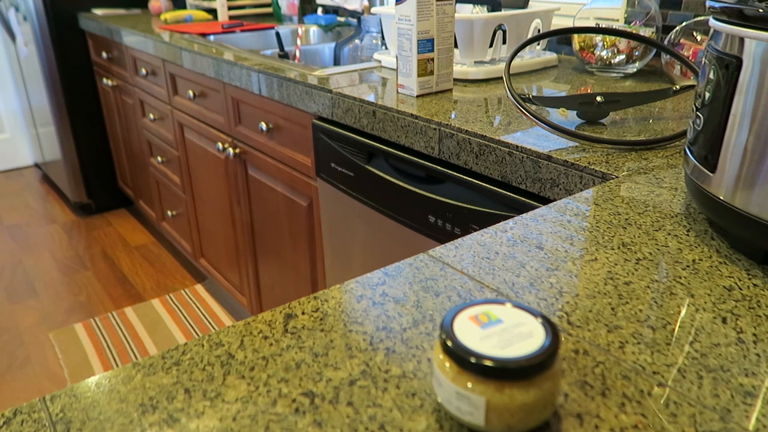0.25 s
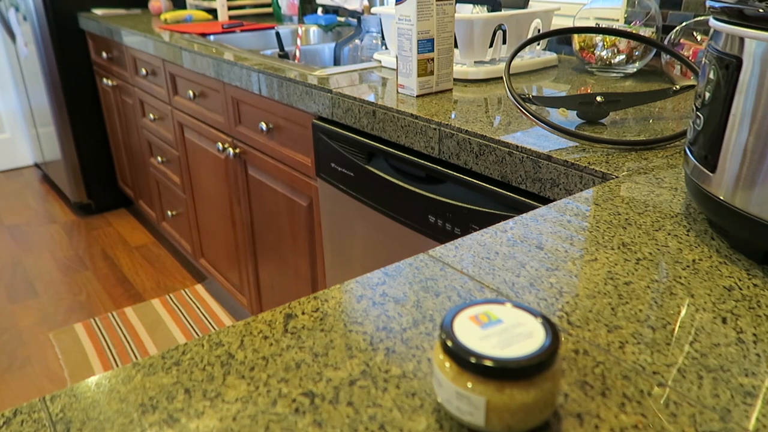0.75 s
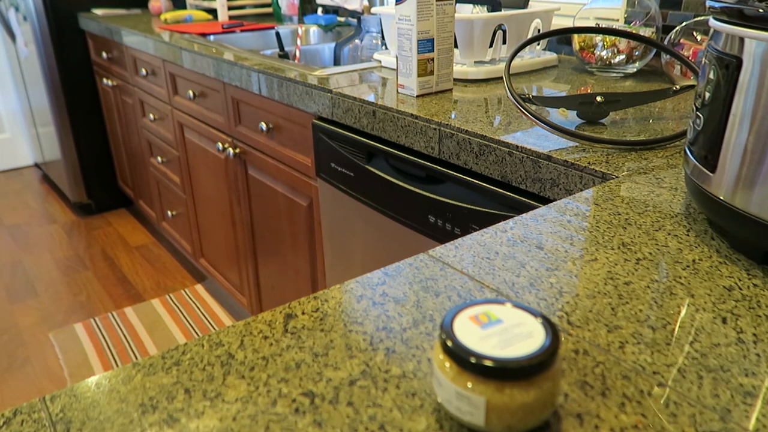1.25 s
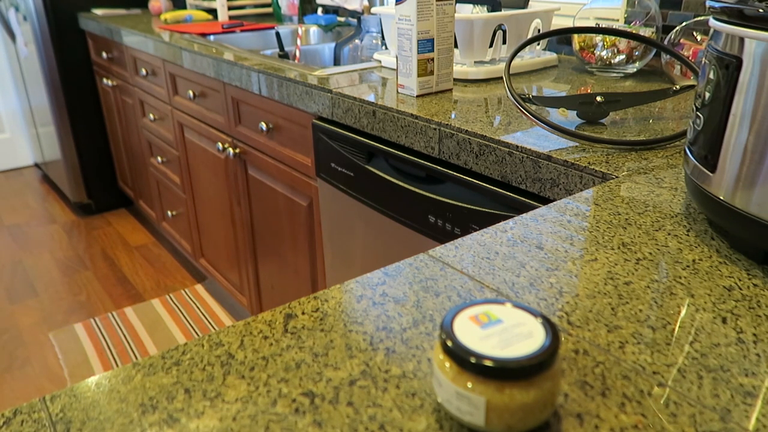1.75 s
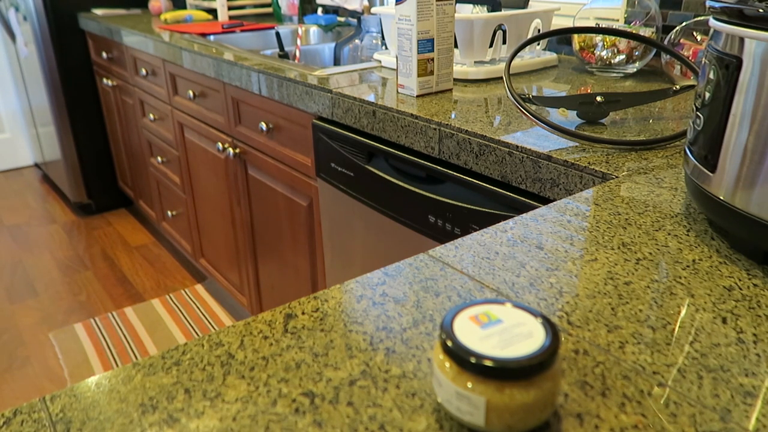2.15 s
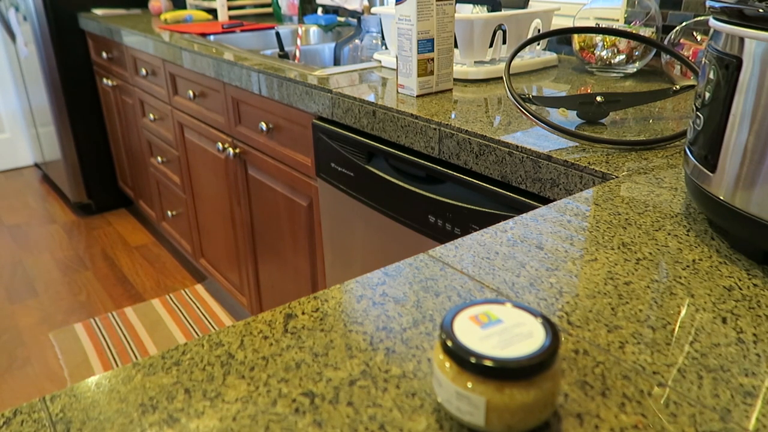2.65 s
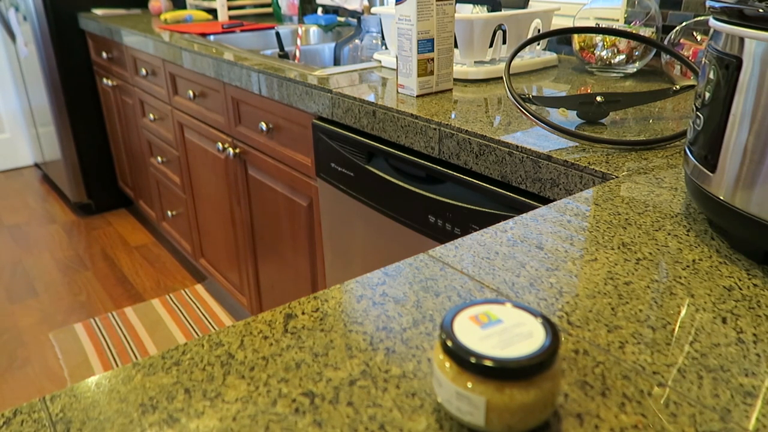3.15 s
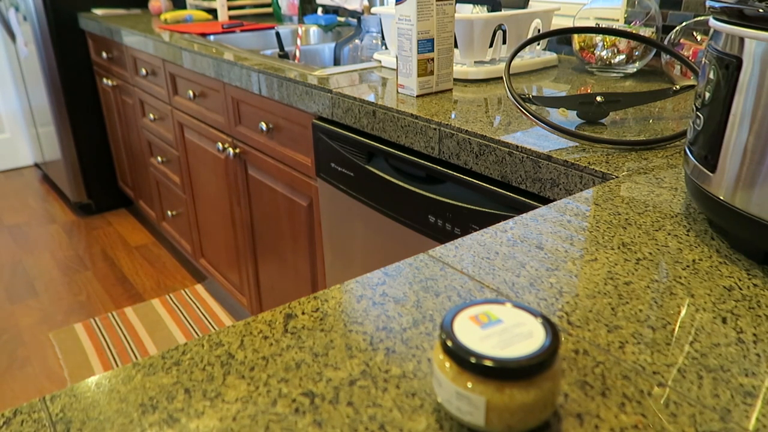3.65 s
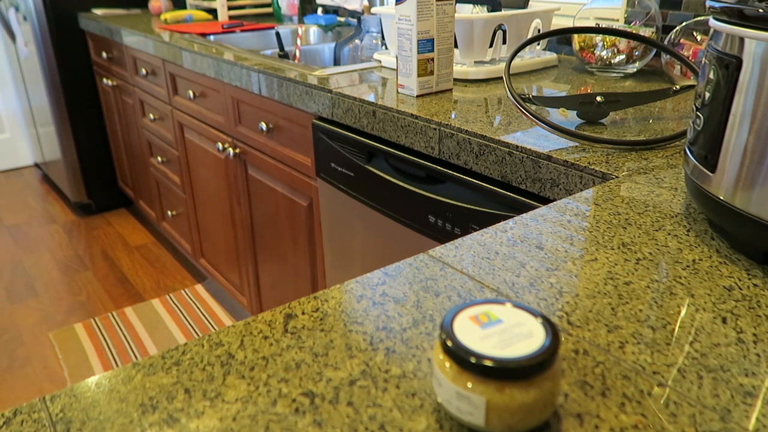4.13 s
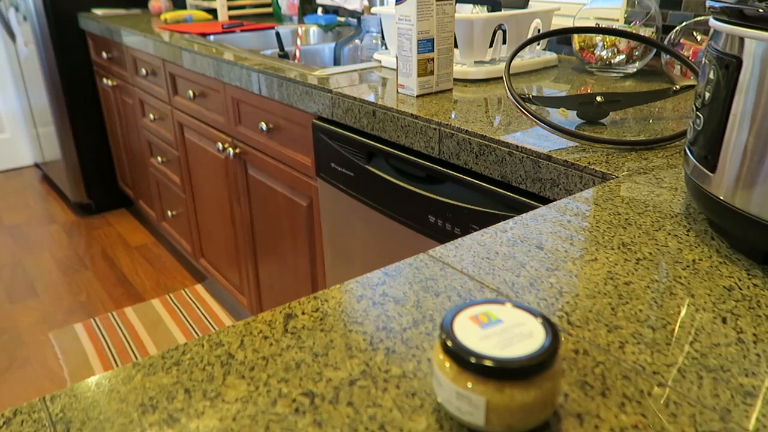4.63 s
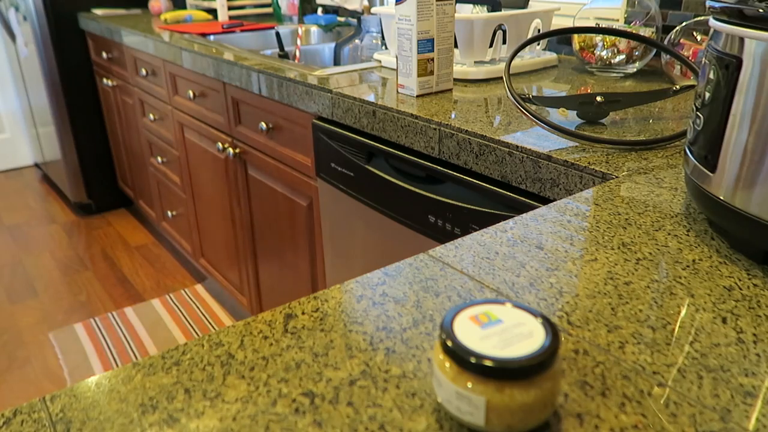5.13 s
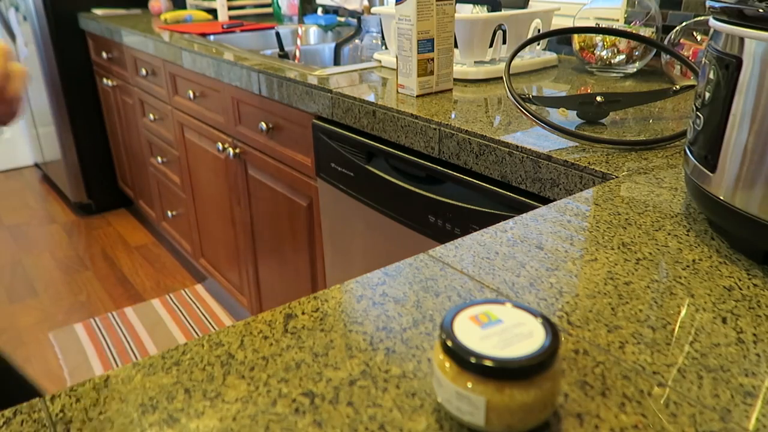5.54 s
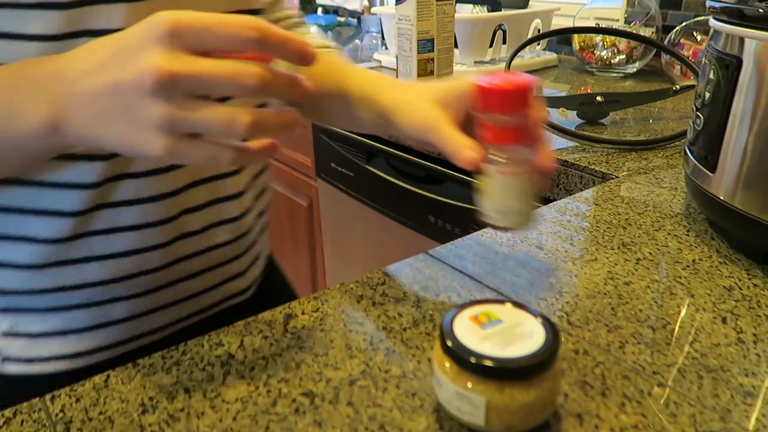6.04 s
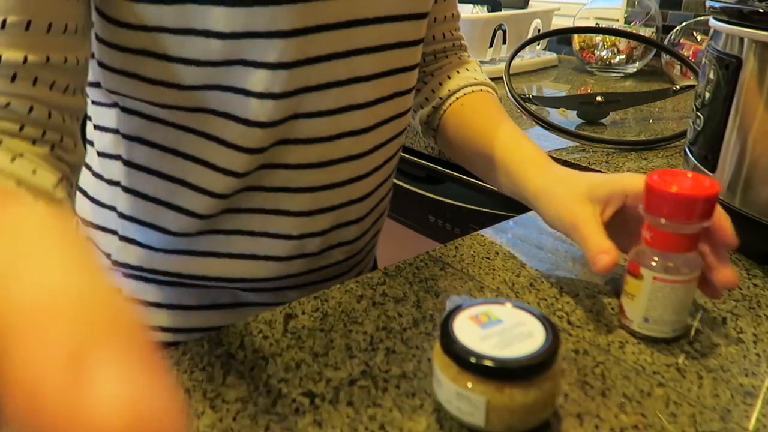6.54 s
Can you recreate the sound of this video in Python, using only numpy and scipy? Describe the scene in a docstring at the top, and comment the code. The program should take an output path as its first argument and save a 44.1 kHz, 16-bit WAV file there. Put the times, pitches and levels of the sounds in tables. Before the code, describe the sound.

Cupboard doors knock in a home kitchen, one very loud around three seconds, then footsteps approach and a spice jar clicks down close by.

```python
"""Cupboards and a jar in a kitchen

Heard from a stone counter: heavy and light wooden doors knock as damped panel modes with cracks of coloured noise.
Shelf contacts, crockery, loose hardware and a singing hinge are short noise bursts or decaying modes.
Footfalls boom in the floor; a spice jar set down close by clicks, rings and thuds as its grains patter.
A fridge hums in wavering partials over fan noise. Decaying noise supplies the echoes of the room.
"""
import sys
import numpy as np
from scipy import signal
from scipy.fft import rfft, irfft
from scipy.io import wavfile

SR = 44100
rng = np.random.default_rng(int(sys.argv[2]) if len(sys.argv) > 2 else 0)


def digitize_waveform(pressure):
    """Quantize a signal to 16-bit integers and store it at the path in sys.argv[1].

    Rows of a 2-D input are taken as channels; values are limited to [-1, 1].
    """
    field = np.atleast_2d(pressure).T
    bounded = np.clip(field, -1, 1)
    quanta = np.round(bounded * 32767).astype(np.int16)
    wavfile.write(sys.argv[1], SR, quanta)


N = 299306
TIME = np.arange(N) / SR
RING = TIME[:SR]  # time axis of one event, 1 s long
LEFT_RIGHT = np.array([[1], [-1]])

# Fan noise spectrum before scaling to rms 1: f/Hz, relative level/dB
AIR_SPECTRUM = [(12, -56), (20, -9), (49, -3), (89, -6), (111, -2), (174, -6), (194, -2.5), (294, -10),
                (377, -9), (470, -11.5), (693, -13.5), (818, -18.5), (1550, -23), (7100, -43), (12000, -51),
                (15000, -70)]
# Fan noise, difference of the ports against their sum: f/Hz, side minus mid/dB
AIR_SIDE = [(60, -35), (110, -12.5), (200, -5), (380, 2), (700, -3), (1290, -0.5), (2380, -1.5),
            (4400, 1.5), (8120, 1), (15000, 5.5)]
AIR_DB = -46.5
# Steady fridge partials: f/Hz, level/dB
HUM_PARTIALS = [(118.4, -64), (172.3, -53), (296.1, -59), (473.7, -61.5), (678.3, -67), (1184, -74)]
# Partials that swell once a body stands near: f/Hz, level/dB
NEAR_HUM_PARTIALS = [(118.4, -53.5), (355.3, -53.5)]

# Reverberation time of the kitchen: f/Hz, t60/s
ROOM_T60 = [(60, 0.37), (200, 0.42), (500, 0.65), (1500, 0.64), (3000, 0.65), (6000, 0.98), (14000, 0.39)]
# Echo, difference of the ports against their sum: f/Hz, side minus mid/dB
ROOM_SIDE = [(60, -39), (150, -35), (300, -13), (1000, -17.5), (3000, -13.5), (6000, -5.5), (12000, 7)]

# Faint high rubbing: t/s, level/dB, time to fall about 20 dB/s
SWISHES = [(3.728, -55, 0.18), (4.126, -57, 0.061), (4.254, -60, 0.12), (5.457, -66, 0.23)]
# Runs of faint high ticks: start t/s, end t/s, mean level/dB
FAINT_TICKING = [(0.055, 0.758, -54.5), (6.219, 6.46, -53)]
# Small close ticks and the jar let go: t/s, level/dB, centre f/Hz
TICKS = [(5.575, -47, 6860), (5.778, -41.5, 2140), (5.962, -34, 654), (6.060, -40.5, 2310),
         (6.061, -42, 5800), (6.075, -43, 2750), (6.118, -40, 676), (6.694, -45, 5300), (6.7585, -29, 2230)]

# Footfalls on the wooden floor: t/s, level/dB
STEPS = [(4.301, -30), (4.512, -30), (5.249, -25), (5.957, -33)]
# Floor board modes: f/Hz, relative level/dB, t60/s
FLOOR_MODES = [(32.6, 4, 0.21), (44, 7.5, 0.31), (60, -13, 0.11), (102, 0, 0.1), (135, -32, 0.13)]

# Things dragged along the shelf: t/s, level/dB, length/s, centre f/Hz, width/Hz
SLIDES = [(3.24, -56, 0.13, 1490, 990), (4.576, -60, 0.1, 2170, 2000), (4.72, -60, 0.19, 1680, 600)]
# Crockery touching: t/s, level/dB, f/Hz
CLINKS = [(1.673, -36, 1040), (1.674, -51, 1310), (2.434, -38, 1210), (2.435, -40, 1730)]
# Things shifted on the shelf: t/s, level/dB, centre f/Hz, width/Hz
SHELF_CONTACTS = [(0.006, -34, 595, 1400), (1.52, -33.5, 1320, 800), (1.524, -49, 3130, 900),
                  (1.534, -38, 2000, 900), (1.542, -44.5, 3030, 700), (1.546, -43, 1660, 500),
                  (1.588, -47, 2680, 900), (1.674, -41, 1500, 1000), (3.228, -36, 1400, 800),
                  (3.248, -39, 1700, 1010), (3.322, -42, 1370, 700), (5.252, -36.5, 1300, 1540),
                  (5.258, -39.5, 2750, 1010), (5.266, -47.5, 5100, 900)]
# Each then tips onto an edge: later, softer, duller (the pitch is a ratio)
SETTLE_S, SETTLE_DB, SETTLE_PITCH, SETTLE_WIDTH_HZ = 0.0099, -10.5, 0.52, 2700

# Loose hinges, knobs and catches clattering: t/s, level/dB, centre f/Hz, width/Hz
FITTINGS = [(0.197, -41, 4000, 1200), (0.211, -36, 1800, 900), (0.225, -47, 3800, 1600),
            (2.692, -16.5, 1330, 350), (2.695, -31.5, 3400, 900), (2.705, -26, 3000, 400),
            (2.712, -25, 2950, 280), (2.713, -27, 1400, 450), (2.7195, -23, 1990, 480),
            (2.738, -33.5, 2600, 700), (2.757, -31, 2300, 800), (2.791, -34, 2950, 350),
            (2.858, -35, 1200, 600), (2.968, -43, 1800, 700), (2.979, -46, 3000, 700),
            (2.991, -31, 1700, 800), (2.995, -41, 3300, 600), (3.047, -38, 1700, 823),
            (3.075, -49, 2200, 1200), (4.175, -31, 2100, 500), (4.184, -36, 2200, 650)]
HINGE_AT_S, HINGE_DB = 2.966, -37.5
# Hinge spring modes: f/Hz, relative level/dB, t60/s
HINGE_MODES = [(782, 6, 0.17), (847, 7, 0.12), (810, -7, 0.45)]
# Cabinet body modes: f/Hz, level/dB, t60/s
CABINET_MODES = [(105.6, -32, 0.13), (140, -31, 0.11), (276, -28.5, 0.15)]

# Jar landing and rocking twice, each rim first, then flat: t/s, force/dB, rim-to-flat time/s
JAR_LANDINGS = [(6.4796, -0.2, .0054), (6.4965, -12, .006), (6.5138, -8.5, 0.00183)]
# Jar wall modes: f/Hz, relative level/dB, t60/s
JAR_MODES = [(551, -10.5, 0.092), (700, -12, 0.12), (792, -1, 0.05), (1108, 8, 0.046), (1224, -6, 0.08),
             (1350, -4, 0.08), (1765, -12, 0.051), (1915, -1, 0.089), (1990, -15, 0.077),
             (2560, -5.5, 0.07), (2715, -3.5, 0.094), (2888, -2, 0.17), (3016, -5.5, 0.16),
             (3137, -10.5, 0.072)]
# Counter modes: f/Hz, relative level/dB, t60/s
COUNTER_MODES = [(95.4, 12.5, 0.18), (124, 6, 0.062), (158, 3, 0.079), (291, 2.5, 0.086), (384, -6, 0.13),
                 (720, -8, 0.068), (744, 3.5, 0.034)]
# Click of jar on stone: f/Hz, relative level/dB
JAR_CLICK = [(60, -5), (200, 3.5), (800, -5), (1800, 4.5), (2300, 0.5), (3200, -3), (4300, -10),
             (8000, -18), (10500, -45), (14000, -21)]
RIM_CUT_HZ, FLAT_CUT_HZ = 4200, 3600  # top of the click for either contact
JAR_CLICK_DB, JAR_RING_DB, THUD_DB = -16, -21, -27.5  # at full force
BODY_GROWTH = 2.5  # dB of ring and thud per dB of force: a light touch mostly clicks
JAR_ECHO_S, JAR_ECHO_BUILD_S = 0.022, 0.015  # the jar is close: the walls answer late and swell slowly
JAR_WALLS_DB, JAR_NEARBY_DB = -16, -16.5  # echo from the walls and from things on the counter
SPICE_DB, SPICE_HZ, SPICE_WIDTH_HZ, SPICE_T60_S = -46.5, 11500, 12000, 0.12

# Light door nudged, knocking, juddering, falling back: t/s, force/dB, crack level/dB, crack cut-off f/Hz
LIGHT_KNOCKS = [(1.477, -35, -51, 1970), (1.523, -33.5, -43.5, 3620), (1.766, -34, -50, 2000),
                (2.422, -29.5, -46, 2000), (2.635, -27.5, -46.5, 2000), (2.689, -0.5, -22.5, 8340),
                (2.752, -21, -35, 3500), (2.771, -24.5, -41.5, 2370), (2.789, -20, -33.5, 2400),
                (2.965, -13, -28.5, 4030), (2.99, -22.5, -38, 4000), (3.228, -32, -49, 2000),
                (3.485, -34.5, -47.5, 1500), (3.499, -28, -51, 1520)]
# Light panel modes: f/Hz, relative level/dB, t60/s
LIGHT_MODES = [(169, -12.5, 0.12), (185.9, -4.5, 0.13), (258, -3, 0.07), (282, -11.5, 0.13),
               (375, 3, 0.048), (387, -13.5, 0.14), (708, -14, 0.064), (880, -43, 0.3), (1150, -9.5, 0.023),
               (1400, -20, 0.039), (1610, -38, 0.18)]
# Light door's crack of wood on the frame: f/Hz, relative level/dB
LIGHT_CRACK = [(100, -31), (260, 1), (420, 8.5), (580, 2), (1100, 1), (1600, 1), (2000, -8.5), (2400, -5.5),
               (3200, -11.5), (4500, -15), (6500, -25.5), (8000, -33), (14000, -43)]
# Heavy door on its bumpers: t/s, force/dB, crack level/dB, crack cut-off f/Hz, rebound minus blow/dB
HEAVY_KNOCKS = [(0.005, -28.5, -37, 2000, -25), (0.182, -13.5, -27, 5160, 0), (0.55, -35.5, -59, 2000, -15),
                (3.999, -34, -57, 2000, -24), (4.155, -6.5, -15, 3820, -18.5)]
# Heavy panel modes: f/Hz, relative level/dB, t60/s
HEAVY_MODES = [(63.6, -16, 0.36), (95.7, -3, 0.23), (126, 8, 0.064), (152.5, 8, 0.071), (184.2, -4, 0.1),
               (251.4, -5.5, 0.13), (401, -12, 0.1), (481.4, -20, 0.15), (750, -3.5, 0.02),
               (842, -24, 0.094), (1206, -16.5, 0.029), (1960, -38, 0.087)]
# Heavy door's crack of wood on the frame: f/Hz, relative level/dB
HEAVY_CRACK = [(100, -6), (300, 11.5), (450, 8), (750, 9), (1100, -5.5), (1600, 0.5), (2400, -1.5),
               (3200, -7), (3900, -17.5), (4800, -18.5), (8000, -18.5), (14000, -30)]
HEAVY_REBOUND_S = 0.0218  # the panel springs back and lands again
HEAVY_CRACK_LAG_S = 0.0055  # the frame is hit once the bumpers are squeezed flat
# How well the cabinets radiate treble: f/Hz, level/dB
WOOD_TREBLE = [(2800, 0.5), (3600, 0), (4000, -2.5), (5100, 0.5), (6500, 1), (9000, 6), (12000, 1)]
TOP_HZ = 14800


def undb(db):
    """Level: an amplitude gain is ten to the power of dB/20."""
    return 10 ** (np.asarray(db) / 20)


def at(points, hz):
    """Interpolation: (f, value) points are read on a log-frequency axis."""
    f, value = np.transpose(points)
    return np.interp(np.log(hz + 0.0011), np.log(f), value)


def shape(x, gain):
    """Linear filtering: the spectrum is multiplied by a gain that depends on frequency."""
    size = x.shape[-1]
    frequencies = np.arange(size // 2 + 1) * SR / size
    return irfft(rfft(x) * gain(frequencies), size)


def noise(gain, size=SR):
    """Coloured noise: white noise is filtered, then scaled to rms 1."""
    x = shape(rng.standard_normal(size), gain)
    return x / x.std()


def resonance(hz, width_hz):
    """Resonance: the gain peaks at its centre and falls on broad, steep skirts."""
    return lambda f: 1 / (1 + ((f * f - hz * hz) / (f * width_hz * 2 + 1)) ** 2) ** 2


def fade(t60, rise_s):
    """Damping: a blow builds up quickly and decays exponentially."""
    build_up = 1 - np.exp(-RING / rise_s)
    return build_up * np.exp(-np.log(1000) * RING / t60)


def ring(modes, rise_s):
    """Modal superposition: one push sets damped sinusoids swinging."""
    return sum(undb(db) * fade(t60, rise_s) * np.sin(2 * np.pi * hz * RING) for hz, db, t60 in modes)


def rattle(spread_db, grain_hz=500):
    """Intermittent contact: random level changes make a chattering gain of rms 1."""
    gain = undb(spread_db * noise(lambda f: np.exp(-f / grain_hz)))
    return gain / np.sqrt(np.mean(gain ** 2))


def unsteady(modes, rise_s, waver_db, waver_hz):
    """Modulated modes: each mode of a rocking or moving thing swells and dips on its own."""
    return sum(ring([mode], rise_s) * rattle(waver_db, waver_hz) for mode in modes)


def burst(colour, envelope):
    """Energy scaling: a puff of coloured noise carries the energy of its envelope."""
    x = noise(colour) * envelope
    return x * np.sqrt(np.sum(envelope ** 2) / np.sum(x ** 2))


def radiate(x, lowest_hz):
    """Radiation efficiency: a panel radiates poorly below its lowest modes."""
    return signal.sosfilt(signal.butter(2, lowest_hz, "high", fs=SR, output="sos"), x)


def add(track, s, sound):
    """Superposition: a sound is summed into a track from time s."""
    start = max(int(s * SR), 0)
    track[start:start + len(sound)] += sound[:N - start]


def strike(blows, sound):
    """Linearity: the same ringing body answers every (t, level) in proportion."""
    out = np.zeros(N)
    for s, db in blows:
        add(out, s, undb(db) * sound)
    return out


def widen(mid, side, side_db):
    """Spatial coherence: two close microphone ports agree in the bass and differ in the treble."""
    return mid + LEFT_RIGHT * shape(side, lambda f: undb(at(side_db, f)))


def kitchen(gap_s=0.004, build_s=0.00043):
    """Diffuse reverberation: hard walls return noise whose octaves die at their own rates."""
    hiss = widen(*rng.standard_normal((2, SR)), ROOM_SIDE)
    tail = 0
    for hz in 2. ** np.arange(5, 15):
        octave = shape(hiss, lambda f: np.clip(1 - abs(np.log2((f + 1) / hz)), 0, 1))
        tail = tail + octave * fade(at(ROOM_T60, hz), build_s)
    # the decay at 1 kHz sets the energy to about one
    tail = tail / np.sqrt(np.sum(fade(at(ROOM_T60, 1000), build_s) ** 2))
    return np.pad(tail, ((0, 0), (int(gap_s * SR), 0)))


def echo(x, room, wet_db):
    """Convolution: the room answers every instant of a sound with its impulse response."""
    return undb(wet_db) * signal.fftconvolve(x[None], room, axes=1)[:, :N]


def place(x, room, wet_db):
    """Direct and reverberant fields: the two add at the listener."""
    return x + echo(x, room, wet_db)


def clacks(events, room, t60, rise_s, wet_db, spread_db=0):
    """Hard contact: each excites the broad resonance of its object; loose ones chatter."""
    out = np.zeros(N)
    for s, db, hz, width_hz in events:
        chatter = fade(t60, rise_s) * rattle(spread_db)
        add(out, s, undb(db) * burst(resonance(hz, width_hz), chatter))
    return place(out, room, wet_db)


def cracks(contacts, colour, t60, rise_s, spread_db):
    """Contact stiffness: wood chatters on the frame, with the treble cut at each contact's own frequency."""
    out = np.zeros(N)
    for s, db, cut_hz in contacts:
        chatter = fade(t60, rise_s) * rattle(spread_db)
        spectrum = lambda f: undb(at(colour, f)) / np.hypot(1, (f / cut_hz) ** 5)
        add(out, s, undb(db) * burst(spectrum, chatter))
    return out


def hum(partials, waver_db):
    """Tonal vibration: motor partials waver slowly and independently about their levels."""
    out = np.zeros(N)
    for hz, db in partials:
        level = undb(db + waver_db * noise(lambda f: np.exp(-f / 3), size=N))
        out += np.sqrt(2) * level * np.sin(2 * np.pi * (hz * TIME + rng.random()))
    return out


def background():
    """Broadband and tonal sources: fridge fan noise lies under the compressor's partials."""
    mid, side = (noise(lambda f: undb(at(AIR_SPECTRUM, f)), size=N) for _ in range(2))
    fan = undb(AIR_DB) * widen(mid, side, AIR_SIDE)
    nearness = np.interp(TIME, [5.9, 6.15], [0, 1])
    near_hum = nearness * hum(NEAR_HUM_PARTIALS, waver_db=1.5)
    return fan + hum(HUM_PARTIALS, waver_db=1.5) + near_hum


def swishes():
    """Friction noise: brief rubbing gives a broad, high hiss."""
    out = np.zeros(N)
    for s, db, length_s in SWISHES:
        hiss = noise(resonance(hz=11600, width_hz=60000))
        add(out, s, undb(db) * hiss * fade(3 * length_s, rise_s=0.017))
    return out


def ticking(room, per_second, scatter_db):
    """Repeated impulses: tiny ticks scatter in level and stray slightly from even spacing."""
    events = []
    for start, end, db in FAINT_TICKING:
        times = np.arange(start, end, 1 / per_second)
        late, loud = rng.standard_normal((len(times), 2)).T
        for s, more in zip(times + 0.0039 * late, loud):
            events.append((s, db + scatter_db * more, 4400, 700))
    return clacks(events, room, t60=0.022, rise_s=0.0009, wet_db=-2)


def ticks(room):
    """Near field: small contacts close by sound dry, the direct sound outweighing the echo."""
    events = [(s, db, hz, 0.23 * hz) for s, db, hz in TICKS]  # width is a share of the centre
    return clacks(events, room, t60=0.012, rise_s=0.00099, wet_db=-10)


def footsteps(room):
    """Soft impact: slow-rising blows of the heels set the floor boards booming."""
    return place(strike(STEPS, ring(FLOOR_MODES, rise_s=0.016)), room, wet_db=2.5)


def slides(room):
    """Uneven friction: something is dragged along the shelf in fits and starts."""
    out = np.zeros(N)
    for s, db, length_s, hz, width_hz in SLIDES:
        push = np.sin(np.pi * np.minimum(RING / length_s, 1))
        jerks = push * rattle(spread_db=6.5, grain_hz=90)
        add(out, s, undb(db) * burst(resonance(hz, width_hz), jerks))
    return place(out, room, wet_db=1.5)


def clinks(room):
    """Free vibration: touching crockery rings briefly, one damped mode per table row."""
    out = np.zeros(N)
    for s, db, hz in CLINKS:
        add(out, s, ring([(hz, db, 0.032)], rise_s=0.0004))
    return place(out, room, wet_db=2.5)


def shelf(room):
    """Impact then settling: each thing clacks, then gives a lower, grainy scrape."""
    settling = [(s + SETTLE_S, db + SETTLE_DB, hz * SETTLE_PITCH, SETTLE_WIDTH_HZ)
                for s, db, hz, _ in SHELF_CONTACTS]
    clack = clacks(SHELF_CONTACTS, room, t60=0.026, rise_s=0.0007, wet_db=2.0, spread_db=5)
    scrape = clacks(settling, room, t60=0.072, rise_s=0.014, wet_db=-3.5, spread_db=9.5)
    return clack + scrape


def fittings(room):
    """Secondary impacts: loose door hardware clatters around the knocks."""
    return clacks(FITTINGS, room, t60=0.027, rise_s=0.0013, wet_db=-4.0, spread_db=6.5)


def hinge(room):
    """Unequal damping: as the door falls back the cabinet thumps and the hinge spring sings on."""
    out = np.zeros(N)
    spring = unsteady(HINGE_MODES, rise_s=0.00062, waver_db=5.0, waver_hz=30)
    add(out, HINGE_AT_S, undb(HINGE_DB) * spring)
    add(out, HINGE_AT_S, ring(CABINET_MODES, rise_s=0.0067))
    return place(out, room, wet_db=3.5)


def spice():
    """Granular impacts: dry grains patter in the jar at each landing, unlike at the two ports."""
    out = np.zeros((2, N))
    for s, _, _ in JAR_LANDINGS:
        for port in out:
            patter = fade(SPICE_T60_S, rise_s=0.006) * rattle(spread_db=3.5)
            add(port, s, undb(SPICE_DB) * burst(resonance(SPICE_HZ, SPICE_WIDTH_HZ), patter))
    return out


def jar(nearby, walls):
    """Coupled impact: each contact clicks on the stone, rings the jar and thuds through the counter."""
    out, side = np.zeros((2, N))
    thud = radiate(ring(COUNTER_MODES, rise_s=0.0009), lowest_hz=95)
    for s, db, tilt_s in JAR_LANDINGS:
        for contact_s, cut_hz in (s, RIM_CUT_HZ), (s + tilt_s, FLAT_CUT_HZ):
            colour = lambda f: undb(at(JAR_CLICK, f)) / np.hypot(1, (f / cut_hz) ** 2)
            snap = fade(t60=0.026, rise_s=0.0001)
            click, glance = (undb(JAR_CLICK_DB + db) * burst(colour, snap) for _ in range(2))
            jar_ring = unsteady(JAR_MODES, rise_s=0.0012, waver_db=4, waver_hz=110)
            body = undb(JAR_RING_DB) * jar_ring + undb(THUD_DB) * thud
            add(out, contact_s, click + undb(BODY_GROWTH * db) * body)
            # reflections off nearby things reach the ports unequally
            add(side, contact_s, undb(5.0) * glance)
    heard = out + echo(out, nearby, JAR_NEARBY_DB) + echo(out, walls, JAR_WALLS_DB)
    return widen(heard, side, ROOM_SIDE) * undb(LEFT_RIGHT * -0.3)  # slightly right of centre


def light_door(room):
    """Plate vibration: the thin panel knocks and judders; its edge cracks on the frame at each contact."""
    blows = [(s, db) for s, db, _, _ in LIGHT_KNOCKS]
    boom = strike(blows, radiate(ring(LIGHT_MODES, rise_s=0.0062), lowest_hz=138))
    contacts = [(s, db, cut_hz) for s, _, db, cut_hz in LIGHT_KNOCKS]
    crack = cracks(contacts, LIGHT_CRACK, t60=0.047, rise_s=0.0025, spread_db=3.0)
    return place(boom, room, wet_db=-7.5) + place(crack, room, wet_db=7)


def heavy_door(room):
    """Cushioned impact: the panel booms on its bumpers and rebounds; the frame cracks just after the boom begins."""
    blows = [(s, db) for s, db, _, _, _ in HEAVY_KNOCKS]
    rebounds = [(s + HEAVY_REBOUND_S, db + rebound_db) for s, db, _, _, rebound_db in HEAVY_KNOCKS]
    panel = radiate(ring(HEAVY_MODES, rise_s=0.0056), lowest_hz=72.4)
    boom = strike(blows + rebounds, panel)
    contacts = [(s + HEAVY_CRACK_LAG_S, db, cut_hz) for s, _, db, cut_hz, _ in HEAVY_KNOCKS]
    crack = cracks(contacts, HEAVY_CRACK, t60=0.031, rise_s=0.0011, spread_db=5.5)
    return place(boom, room, wet_db=-3) + place(crack, room, wet_db=4.5)


def scene():
    """Superposition of sources: all share one kitchen, whose echo pattern depends on the spot."""
    heavy_spot, light_spot, shelf_spot, counter_spot = (kitchen() for _ in range(4))
    doors = heavy_door(heavy_spot) + light_door(light_spot) + hinge(light_spot) + fittings(kitchen())
    things = shelf(shelf_spot) + clinks(shelf_spot) + slides(shelf_spot)
    cupboards = shape(doors + things, lambda f: undb(at(WOOD_TREBLE, f)))
    steps = footsteps(counter_spot)
    jar_walls = kitchen(JAR_ECHO_S, JAR_ECHO_BUILD_S)
    person = steps + jar(counter_spot, jar_walls) + spice() + ticks(counter_spot) + swishes()
    return cupboards + person + background() + ticking(shelf_spot, per_second=14, scatter_db=5.0)


def record(dry):
    """Band limiting: a steep elliptic low-pass removes the extreme treble."""
    return signal.sosfilt(signal.ellip(8, 0.2, 80, TOP_HZ, fs=SR, output="sos"), dry)


dry = scene()
out = record(dry)
digitize_waveform(out)
```